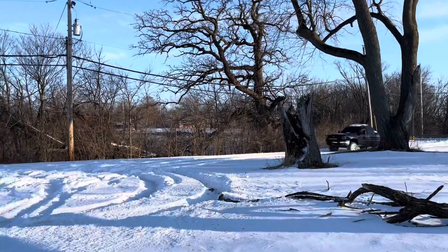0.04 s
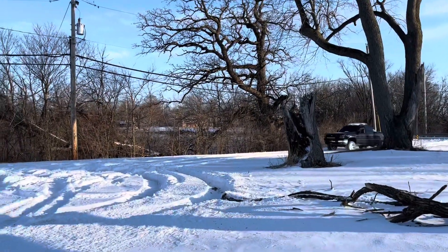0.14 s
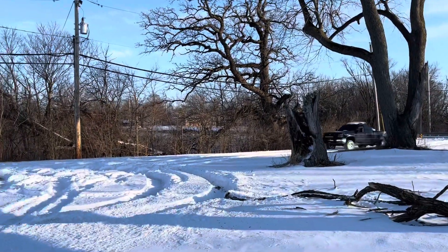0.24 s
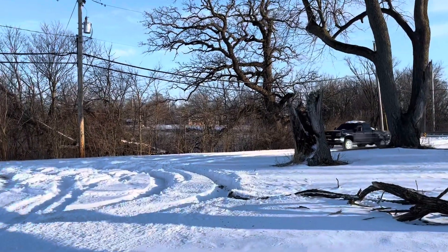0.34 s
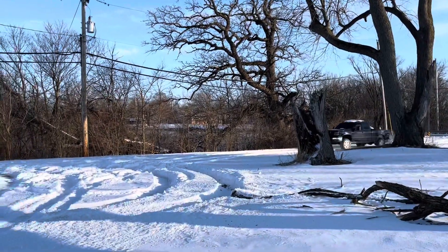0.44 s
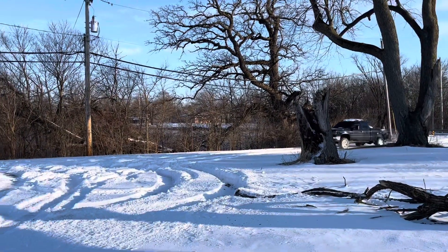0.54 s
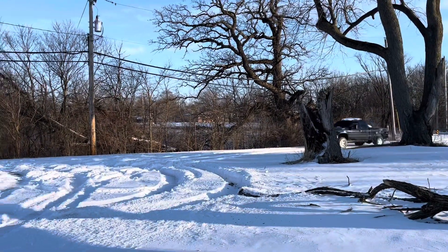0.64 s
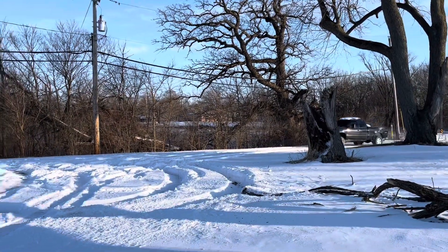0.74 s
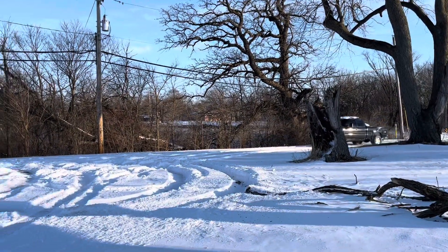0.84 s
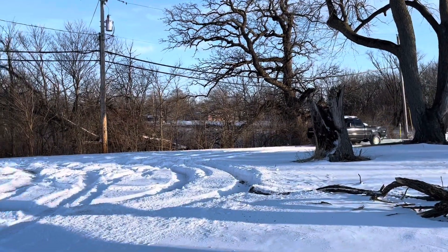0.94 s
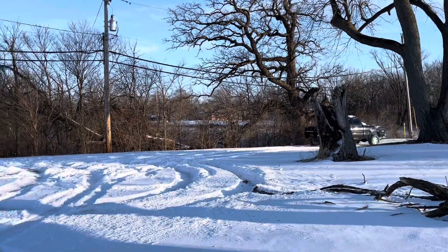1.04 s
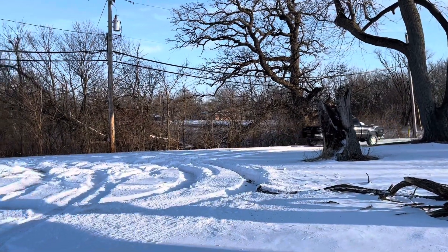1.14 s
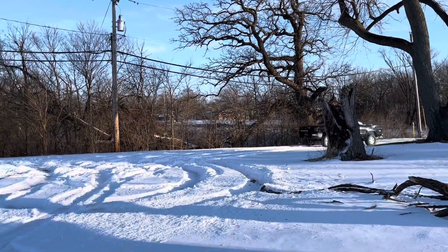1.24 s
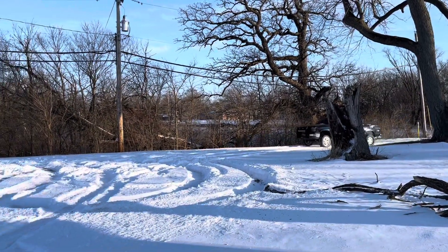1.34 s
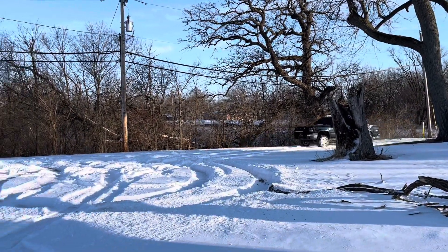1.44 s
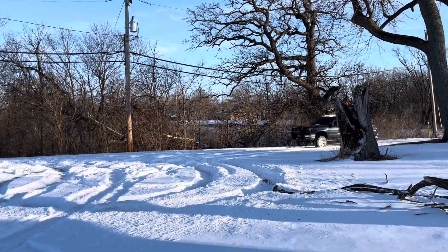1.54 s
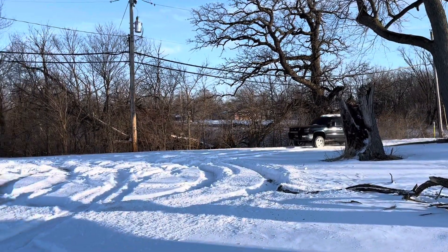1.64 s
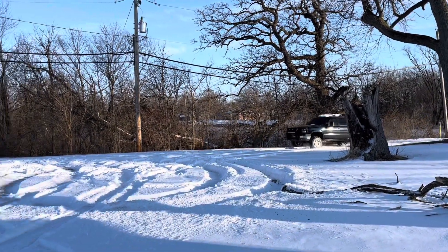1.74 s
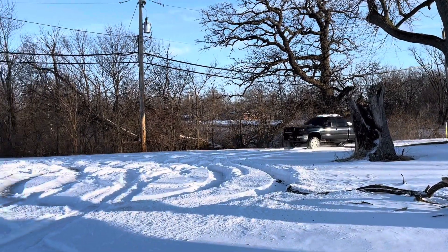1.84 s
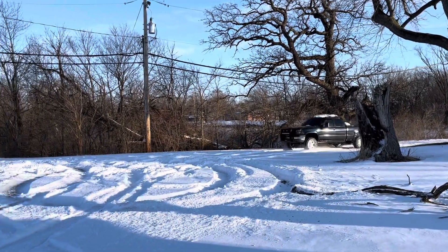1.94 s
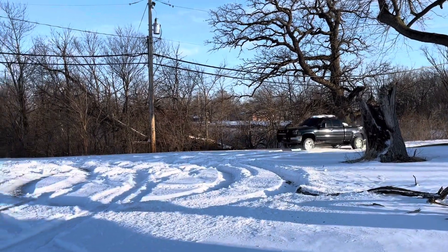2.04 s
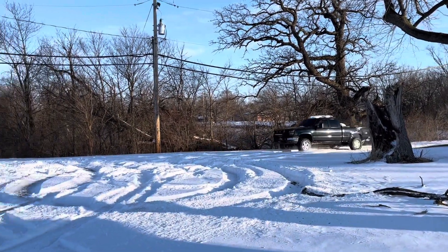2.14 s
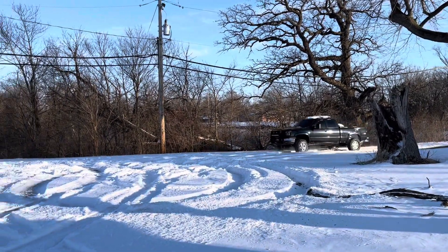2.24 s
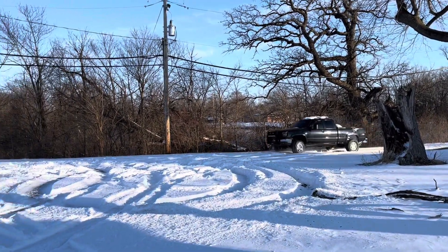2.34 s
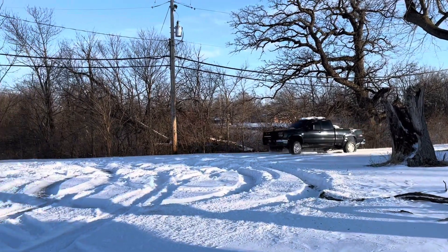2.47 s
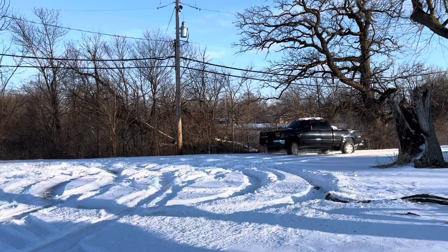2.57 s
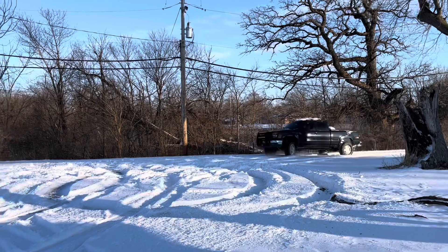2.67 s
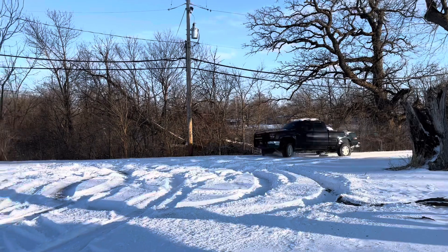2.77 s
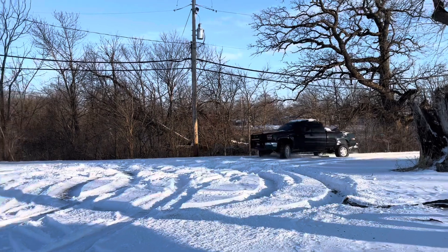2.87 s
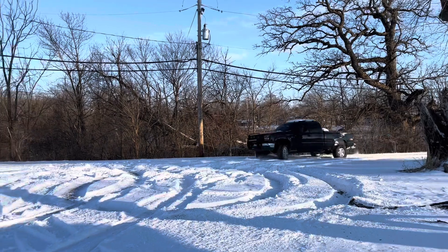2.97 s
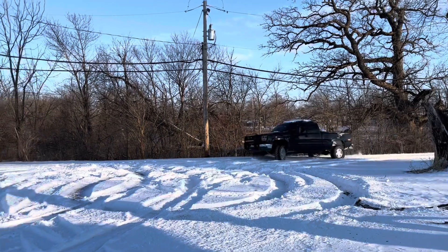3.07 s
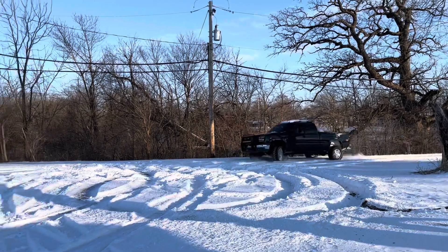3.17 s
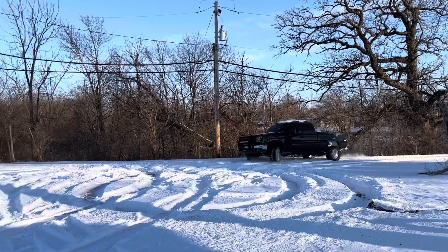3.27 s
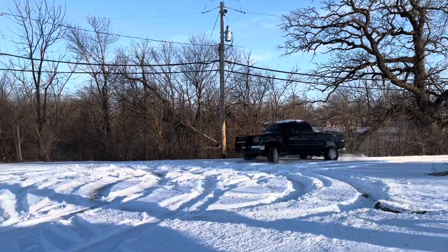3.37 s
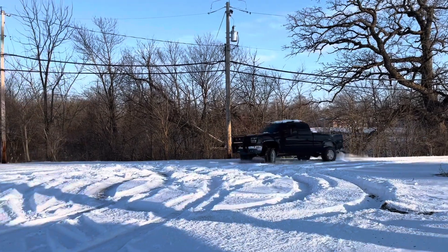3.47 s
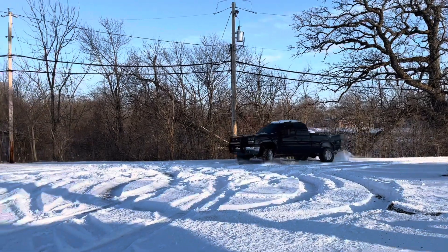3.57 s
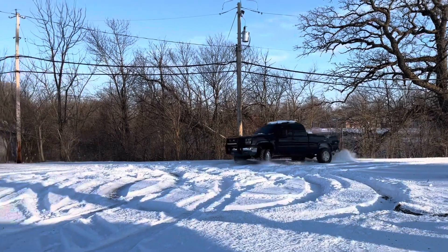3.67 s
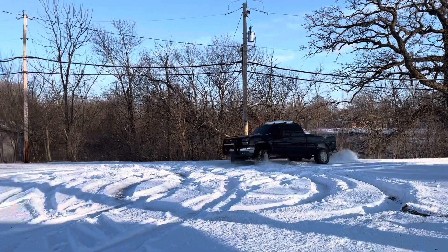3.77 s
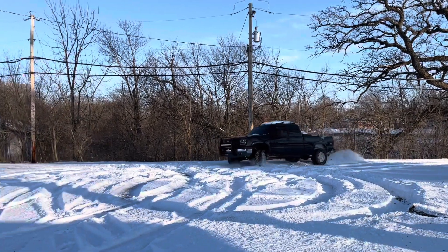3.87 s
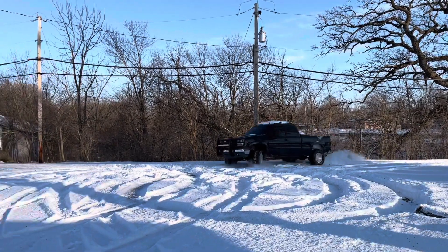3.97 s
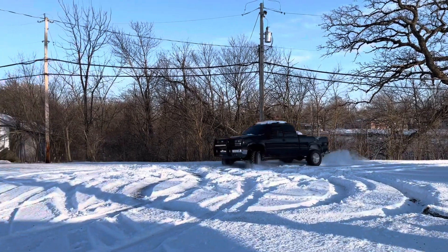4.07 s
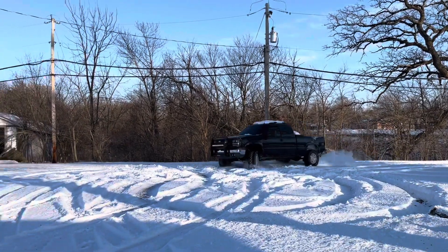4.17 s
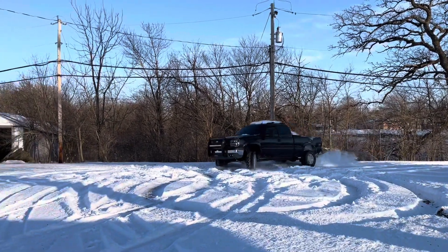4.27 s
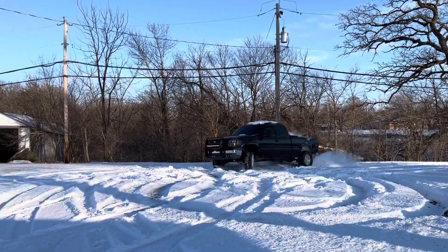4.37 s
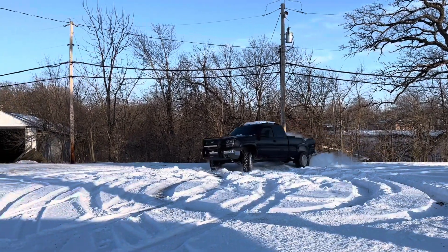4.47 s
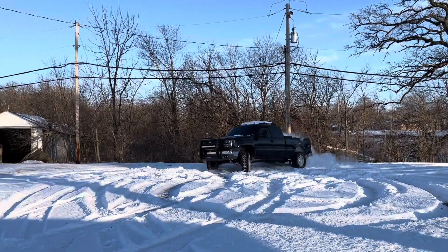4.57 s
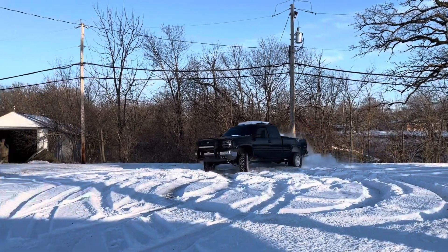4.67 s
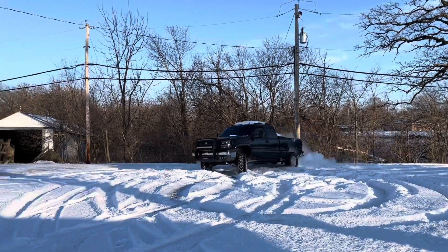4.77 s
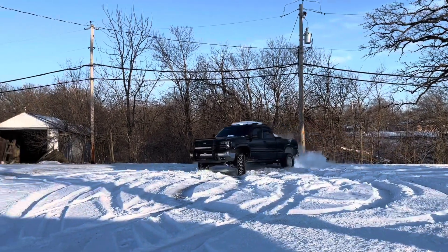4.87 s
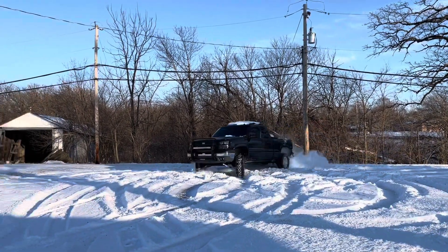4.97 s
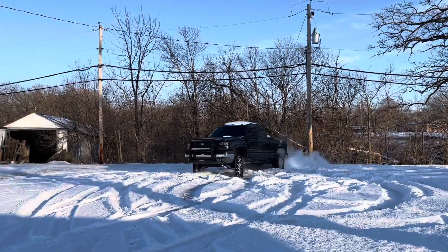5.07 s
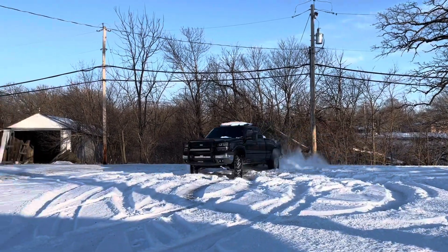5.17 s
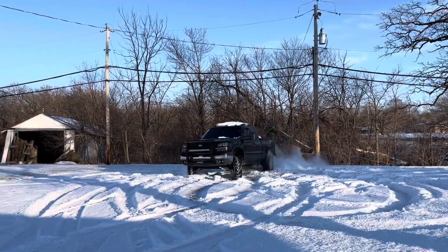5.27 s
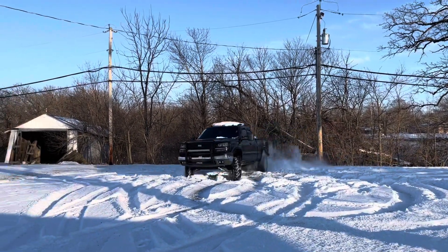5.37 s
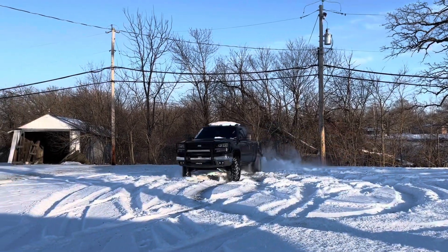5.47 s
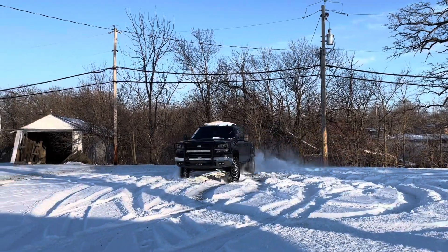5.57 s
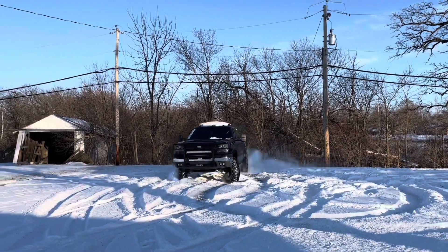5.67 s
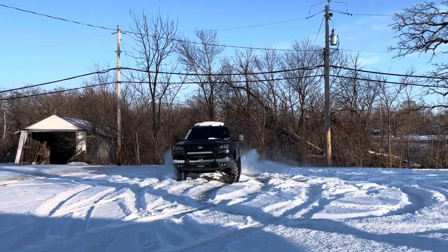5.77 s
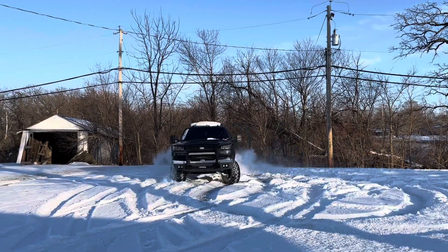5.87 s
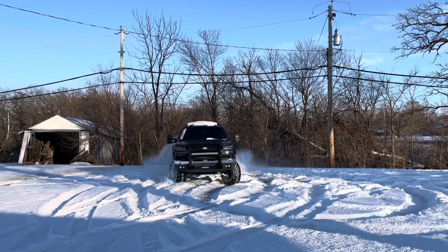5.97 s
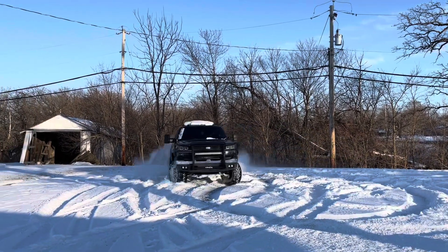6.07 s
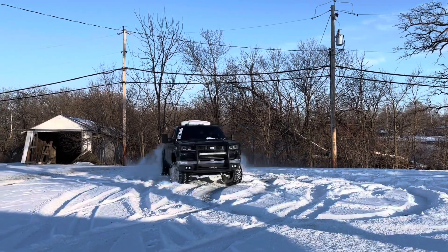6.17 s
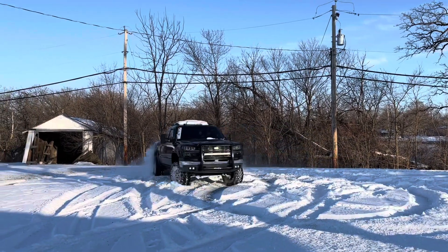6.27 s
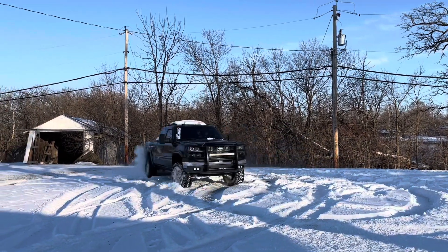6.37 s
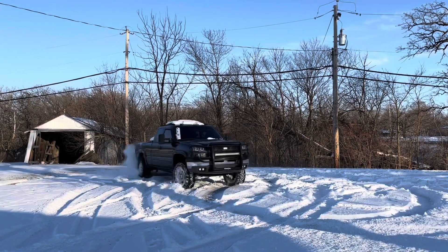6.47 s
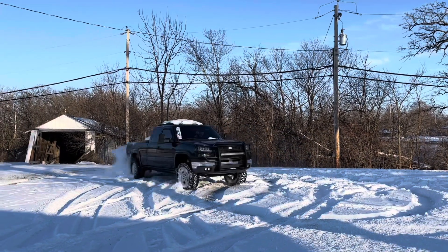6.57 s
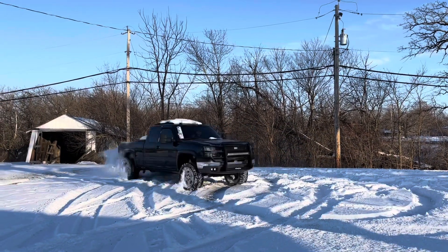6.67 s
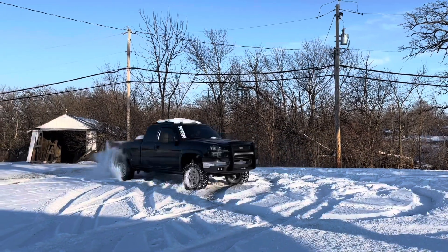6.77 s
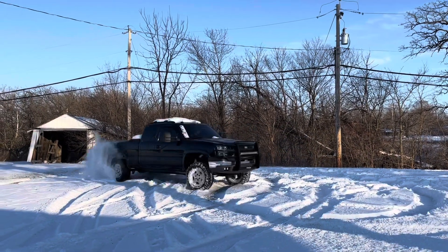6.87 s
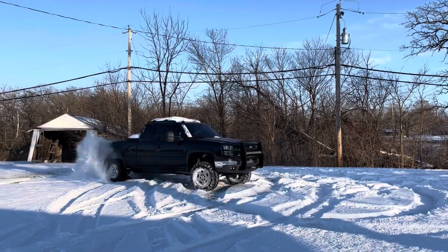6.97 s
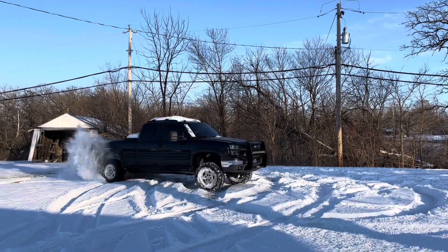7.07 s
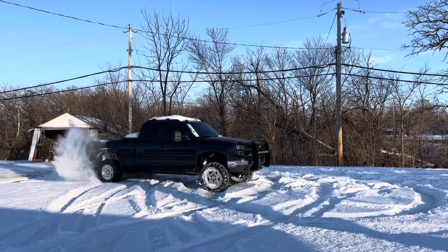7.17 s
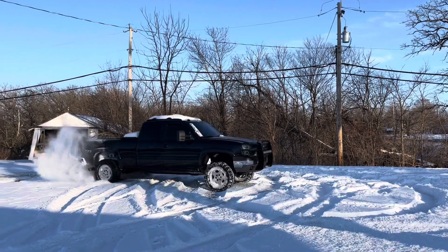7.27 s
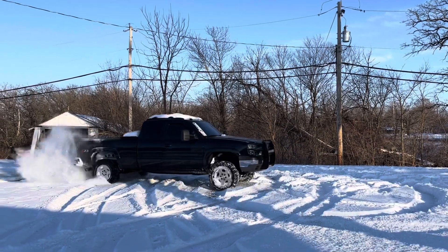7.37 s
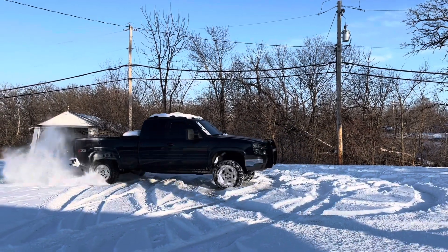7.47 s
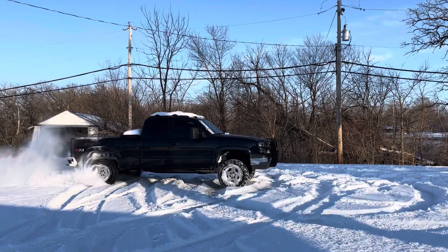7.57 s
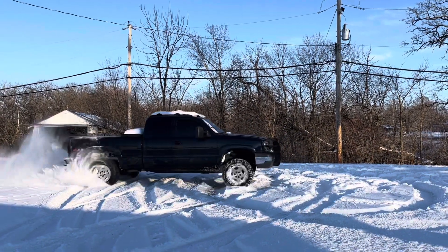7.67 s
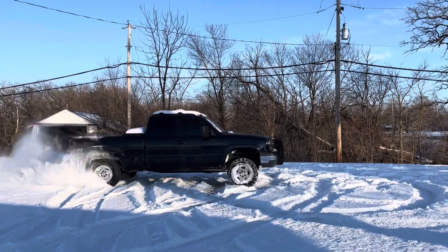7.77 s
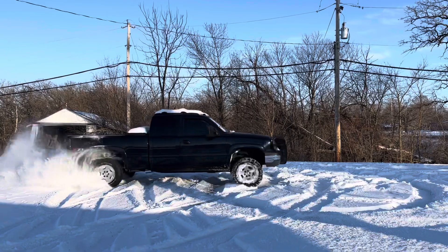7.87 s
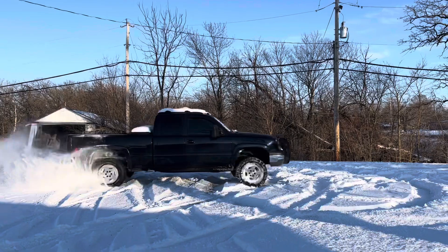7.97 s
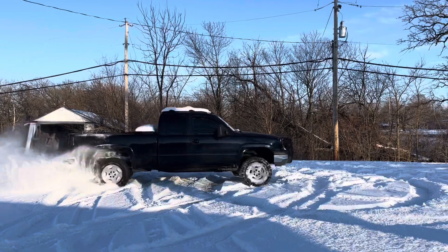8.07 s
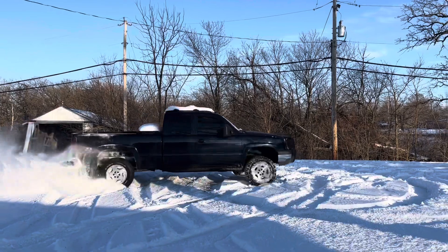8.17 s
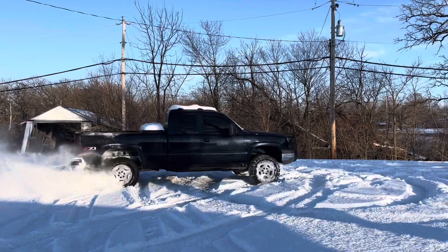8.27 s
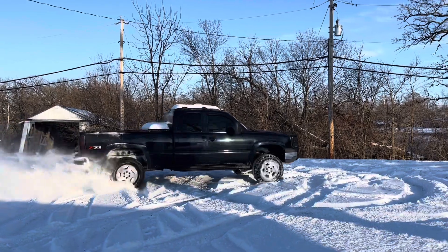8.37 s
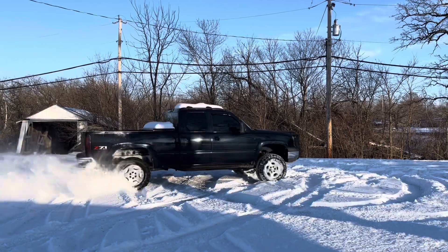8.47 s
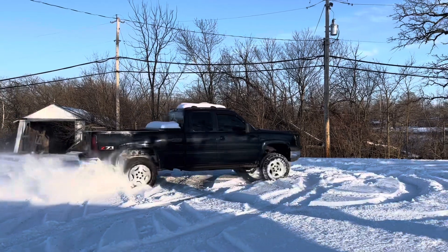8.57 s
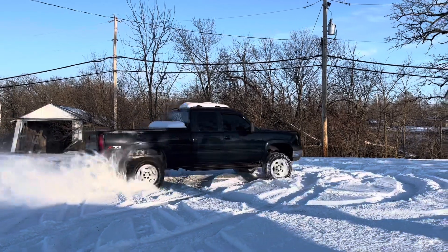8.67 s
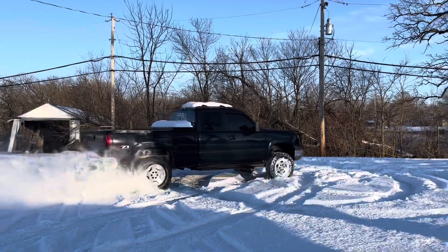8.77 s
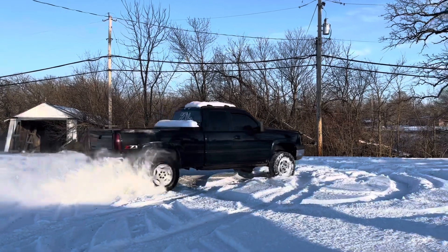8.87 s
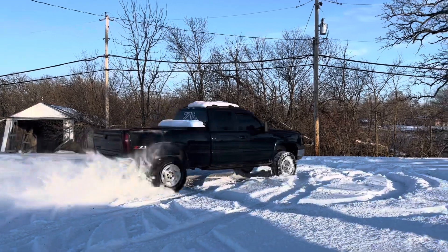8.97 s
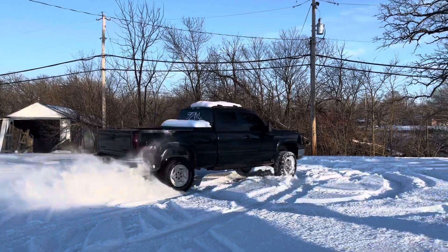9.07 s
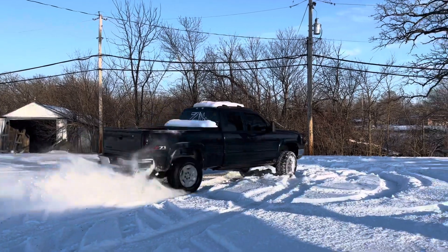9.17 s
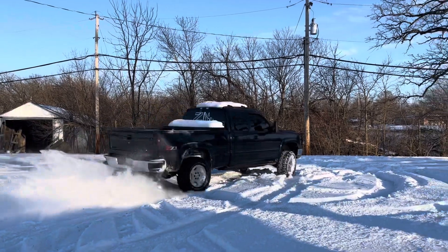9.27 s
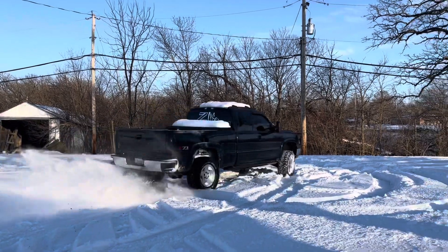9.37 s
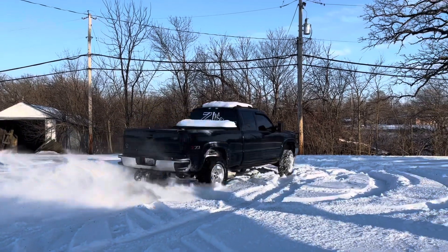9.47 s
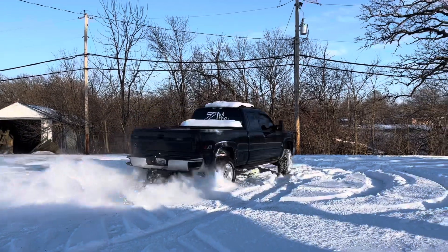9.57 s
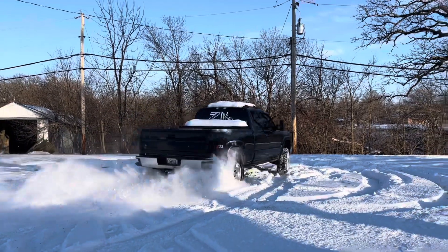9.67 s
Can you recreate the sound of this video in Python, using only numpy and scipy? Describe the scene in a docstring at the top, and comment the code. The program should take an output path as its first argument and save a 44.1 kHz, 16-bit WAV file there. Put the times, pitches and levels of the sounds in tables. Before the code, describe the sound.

Distant uneven engine burble, two throttle blips, then a sustained booming V8 roar nearing with hard exhaust crackle, tyre scrub and snow hiss.

```python
"""First a V8 pickup with open twin pipes burbles far off in a snowy yard, and is blipped twice.
Then it is mostly held high while it slides round and passes close by, left tailpipe first, then right.
The exhaust booms on the orders of the engine cycle, and each firing spits a rasping puff of noise.
Throttle, engine speed, distance and heading set how loud each part is.
Gliding tones make the engine whine; coloured noise makes the tyres scrub and spray snow."""
import sys
import numpy as np
from scipy import signal
from scipy.fft import rfft, irfft
from scipy.io import wavfile
from scipy.ndimage import uniform_filter1d

SR = 44100
rng = np.random.default_rng(int(sys.argv[2]) if len(sys.argv) > 2 else 0)


def materialize(psi):
    """Save the field psi as 16-bit PCM at rate SR to the path in sys.argv[1].

    A 1-D psi becomes a single channel; in a 2-D psi each row is a channel.
    """
    bounded = np.clip(np.atleast_2d(psi).T, -1, 1)
    quanta = np.round(bounded * 32767).astype(np.int16)
    wavfile.write(sys.argv[1], SR, quanta)


N = 428652
TIME, HZ = np.arange(N) / SR, np.arange(N // 2 + 1) * SR / N

# engine speed: time_s, firings_per_s
SPEED = [(0.0, 111.8), (0.11, 110.2), (0.47, 83.6), (0.89, 99.2), (1.3, 81.8), (2.0, 78.9), (2.38, 61.5),
         (2.86, 112.3), (3.02, 112.0), (3.29, 91.6), (3.89, 128.8), (4.28, 96.3), (4.64, 125.5),
         (5.18, 146.7), (5.53, 124.3), (5.78, 133.7), (6.21, 138.6), (6.51, 150.2), (6.79, 138.5),
         (7.25, 135.6), (7.7, 141.5), (8.12, 126.1), (8.66, 134.6), (8.89, 133.9), (9.25, 144.8),
         (9.51, 144.4), (9.72, 148.6)]
# burbling, two blips, then mostly held down: time_s, throttle (0-1)
THROTTLE = [(0, 0.16), (.39, 0.01), (.8, 0.44), (1.14, 0), (1.85, 0.31), (2.33, 0), (2.45, 0.61),
            (2.58, 0.98), (2.86, 1), (3.17, 0.46), (3.5, 0.83), (3.82, 0.86), (4.16, 0.38), (4.42, 1),
            (5.18, 1), (5.34, 0.64), (5.56, 0.85), (6.2, 0.84), (7.7, 0.95), (8.08, .86), (8.6, 0.97),
            (9.72, 0.96)]
# the truck's path: time_s, distance_m, near flank turned to us (0-1), nose turned to us (0-1)
PATH = [(0, 49, 0, 0.3), (2.4, 51.8, 0, 0.07), (3.7, 21.6, 0.09, 0), (5.15, 22.8, 0.19, 0.65),
        (5.55, 18, 0.4, 0.4), (6.2, 20.6, 0.45, 1), (6.55, 16.9, 0.71, 0.79), (7.4, 15.3, 0.98, 0.43),
        (8.3, 13.95, 1, 0.06), (9.72, 17.7, 0.73, 0.13)]
# how the truck is turned: time_s, heading_degrees (0 head-on, 90 right flank, 180 tail)
HEADING = [(4.9, -47.5), (5.7, -2.5), (6.2, 1.5), (7.2, 47.5), (8.2, 96.5), (8.9, 93), (9.4, 132)]

# one engine cycle, uneven on each bank: place (in firings), share through right pipe (0-1), strength_db
FIRINGS = [(4.38, 1, 4), (5.66, 0, 2), (6.3, 1, .5), (7.3, 1, -.5), (8.6, 0, 0), (9.35, 1, -4),
           (10.5, 0, -3), (11.5, 0, -1)]
# strength of each order of the engine cycle: order, light_throttle_db,
# then pulling_db at four headings: left front, head-on, right flank, right rear
ORDERS = [(3, -21, -3, -23.5, -5, -11.5), (4, -10, -9.5, -8, -16.5, -17), (5, 4.0, -3.0, -11.5, -8.0, -6.5),
          (6, -10.5, -6.5, -11.5, -13, -13), (7, -1, -9, -16.5, -7.5, -7.5), (8, 0.0, 0.0, 0.0, 0.0, 0.0),
          (9, -4, -3.5, -8, -3.5, -8), (10, -18.5, -4.5, -23.5, -13, -12.5),
          (11, 2.5, -9, -14, -10.5, -7.5), (12, -27.5, -9, -6.5, -10, 0), (13, -1.5, -10, -4.5, 1.5, 1),
          (14, -23, -22, -16, -14.5, -17), (15, -4.5, -12.5, -7, -8.5, -2.5),
          (16, -7.5, -17.5, -12.5, -1.5, -5), (17, -13.5, -8, -11.5, -7.5, -12),
          (18, -20, -9.5, -18, -13.5, -13.5), (19, -9.5, -12.5, -19.5, -22.5, -11),
          (20, -16.5, -17.5, -15.5, -8.5, -10.5), (21, -15.5, -18.5, -26.5, -15.5, -29.5),
          (22, -23, -17, -31, -7.5, -18.5), (23, -18.5, -25.5, -22, -8.5, -6.5),
          (24, -19.5, -27, -23, -19, -14.5), (25, -25, -30, -30.5, -20, -34.0),
          (26, -25, -24, -31.5, -18, -21.0), (27, -19.5, -24.5, -26, -26.5, -22.5),
          (28, -23, -27.5, -36, -20.5, -23), (29, -15, -23, -36, -22, -29),
          (30, -17, -29, -38.5, -25, -27.0), (31, -24, -29.5, -39.5, -21, -26.5),
          (32, -16.5, -35, -31, -21.5, -24.5), (33, -23, -34, -30.5, -24, -30),
          (34, -33, -28, -27.5, -27.5, -32.5), (35, -29, -29.5, -33.5, -21.5, -33),
          (36, -13, -28, -34.5, -13.5, -26.5)]
# headings of those four pulling columns: heading_degrees
ORDER_HEADINGS = (-45, 0, 95, 135)
# resonances of the exhaust pipes, for the drone: pitch_hz, gain_db
PIPE_RESONANCES = [(35, -15), (55, -2.5), (78, 3), (100, 4), (140, 0.5), (165, -1.5), (192, -4),
                   (215, -9.5), (250, -9.5), (280, -7), (312, -3), (335, -7), (370, -7.5), (410, -18)]
# the firing note swells and cancels as the truck moves: time_s, level_db over the boom
FIRING_NOTE = [(0.0, 3.5), (0.23, 1.5), (0.29, -6.5), (1.07, -6.5), (1.27, -3), (2.07, 4), (2.4, 1),
               (3.42, -3), (3.56, 4.5), (3.76, -4), (4.41, 3), (4.58, -1), (5.81, 6.5), (6.15, 2),
               (6.29, -9.5), (6.49, 2.5), (7.54, 8), (7.8, 2), (8.18, 6.5), (9.72, 3)]
# the fifth order, a deep lope: time_s, level_db over the boom
LOPE = [(0.0, 8), (0.15, 4.5), (0.3, -13), (0.76, 3.5), (2.34, -16.5), (2.66, 0), (3.36, -15),
        (3.53, -14.5), (3.71, 5), (4.08, 3.5), (4.3, -21), (4.58, 3), (4.91, -6.5), (5.98, -5),
        (8.11, -0.3), (9.72, -3)]
# the ninth order swells and cancels: time_s, extra_db
NINTH_ORDER = [(3.3, -0.5), (3.9, 6), (5.2, -2), (5.8, 2), (6.2, 10.5), (6.54, -3.5), (7.2, -3), (8.4, 2.5),
               (9.7, -0.5)]
# the upper orders swell and fade as the truck moves: time_s, extra_db
UPPER_ORDERS = [(0, -4.5), (1.1, -2), (1.8, 3.5), (2.7, -9), (3.8, -0.5), (4.5, -0.5), (5.25, 4.5),
                (5.45, 0.5), (5.8, 3), (6.4, 2.5), (7.4, 0.5), (8.6, 2), (9.7, 1.5)]
# one firing per cycle cracks harder as the tailpipe swings to us: time_s, extra_db (each layer takes a share)
CRACKING_FIRING = [(5.5, 0.5), (7.3, -11), (8.1, 3), (8.33, 1), (8.57, 8.5), (8.8, 10), (9.1, 20.5),
                   (9.45, 18.5), (9.62, 11.5), (9.72, -7.5)]

# Loudness rules, one per part of the exhaust, for NEAR_M, HIGH_FIRING_HZ and full throttle:
# base_db, shut_to_full_throttle_db, speed_db (per octave), flank_on_db, nose_on_db
BOOM_LAW = (-12.5, 11, 0, -3.5, 2.5)
# upper orders of the drone, same columns
NOTES_LAW = (-23, 13, 2.5, 2, -2.5)
# growl, same columns; the scene lowers and squeezes the result
GROWL_LAW = (-15.5, 15.5, 5, 8.5, 2.5)
# rasp, same columns
RASP_LAW = (-27.5, 23.5, 9, -2, -3.5)
# hollow pipe colour, same columns
HOLLOW_LAW = (-49, 11, 15, 2, 4)
# ringing tailpipe mouth, same columns
RING_LAW = (-44, 23.5, 5, 5.5, -8.5)
# crackle, same columns
CRACKLE_LAW = (-33, 30.5, 4.5, -3, -10)
# stray pops of unburnt fuel, same columns
POP_LAW = (-34, 22, 4, -10, -5)

# Noise colours; only the shape counts, as each is brought to one level. Deep rumble: pitch_hz, level_db per Hz
RUMBLE = [(20, -25.5), (35, -23), (55, 0), (90, -1.5), (150, -5), (200, -13.5), (300, -21), (450, -31.5)]
# growl: pitch_hz, level_db per Hz
GROWL = [(130, -29.5), (200, -12), (300, 1.5), (370, -0.5), (450, -9), (650, -42.5)]
# rasp away from the flank: pitch_hz, level_db per Hz
RASP_NOSE = [(300, -22), (450, -4), (560, -3), (700, -5.5), (830, 6.5), (1020, -3), (1420, 2), (1750, -7.5),
             (2100, -8.5), (2450, -8.5), (2900, -32)]
# rasp flank-on: pitch_hz, level_db per Hz
RASP_SIDE = [(300, -27.5), (450, -0.5), (650, -1), (870, -0.5), (1020, -5), (1350, -1.5), (1750, -8.5),
             (2050, -9.5), (2350, -20), (2900, -26.5)]
# hollow colour of the pipes, heard even on light throttle: pitch_hz, level_db per Hz
HOLLOW = [(600, -29.5), (760, -0.5), (850, 4.5), (980, -18.5), (1200, -24.5), (1420, -8), (1650, -21),
          (2100, -19), (2480, 2), (2900, -16.5)]
# ringing mouth of the tailpipe, heard when the flank turns to us: pitch_hz, level_db per Hz
RING = [(1600, -15), (1780, 1), (2030, 0), (2200, -11), (2400, -26)]
# crackle away from the flank: pitch_hz, level_db per Hz
CRACKLE_NOSE = [(1700, -27.5), (2400, 9), (2900, -1.5), (3500, 1.5), (4500, -9.5), (5300, -25.5),
                (7500, -29.5), (14000, -34.5)]
# crackle flank-on: pitch_hz, level_db per Hz
CRACKLE_SIDE = [(1700, -24.5), (2350, -10.5), (2700, 2), (3100, -1), (3600, -0.5), (4200, -5), (4650, -5),
                (5100, -15), (6500, -10), (8300, -22.5), (10500, -19.5), (14000, -30)]
# scrubbing tyres: pitch_hz, level_db per Hz
SCRUB = [(400, -3), (650, -8), (900, -0.5), (1050, -7), (1300, -6.5), (1700, -16), (2500, -22)]
# flying snow: pitch_hz, level_db per Hz
SNOW = [(1500, -3.5), (3000, 9), (5000, -2), (6500, -0.5), (9000, -8.5), (12000, -1), (15000, -4)]
# quiet air of the yard: pitch_hz, level_db per Hz
YARD_AIR = [(25, -4), (70, 0), (130, 3.5), (220, -7), (370, -11.5), (480, -18.5), (700, -21), (850, -24),
            (1400, -27.5), (1800, -30.5), (2500, -32.5), (5000, -36), (7500, -51), (14000, -46.5)]

# single harder barks of the exhaust: start_s, peak_db (roughly), pitch_hz
BARKS = [(4.4025, -21.5, 1310), (4.5444, -25.5, 1425), (4.586, -26, 1420), (4.629, -26.5, 1300),
         (4.673, -26.5, 1360), (4.693, -23, 1325), (4.7556, -20, 1195), (4.938, -20, 1374),
         (4.9914, -22, 1190), (5.106, -28, 1520), (6.463, -34.5, 2080), (6.534, -21, 908),
         (6.568, -33, 2100), (6.587, -31, 2080), (6.678, -29.5, 2000), (6.791, -29.5, 1950),
         (6.907, -32, 2160), (7.081, -24.5, 2000), (7.199, -23.5, 2050), (7.2124, -25, 2020),
         (7.318, -27.5, 1980), (7.389, -27.5, 2060), (7.433, -19.5, 1960), (7.4912, -18, 2024),
         (7.5475, -20.5, 2010), (7.5606, -28, 1970), (7.6045, -19, 1066), (7.661, -22.5, 1960),
         (7.72, -22, 2070), (7.7762, -21, 2090), (7.8344, -29.5, 2100), (7.893, -28, 1890),
         (9.2155, -19, 1140), (9.24, -19, 996), (9.272, -18.5, 1380), (9.327, -22, 1990),
         (9.3812, -17.5, 1263), (9.437, -17, 1125), (9.4925, -20.5, 1400)]
# sharp ticks from the far engine as the throttle first opens: start_s, level_db (before a small lift)
TICKS = [(0.582, -56), (0.6454, -52), (0.6774, -52), (0.701, -53), (0.7326, -53), (0.7626, -51),
         (0.787, -54), (0.8334, -55), (0.846, -50), (0.8654, -52), (0.8969, -55), (0.93, -52), (0.949, -59),
         (0.989, -59), (1.034, -55), (1.075, -59), (1.123, -56)]
# what the pipes ring with when a tick or pop strikes them: pitch_hz, level_db, time to fall 60 dB in s
PIPE_MODES = [(846, 3.5, 0.034), (1190, -2, 0.018), (1430, 2.5, 0.013), (2200, -5.5, 0.011),
              (2545, -3, 0.021), (3120, -6.5, 0.02), (3550, -4.5, .02), (4360, -7.5, 0.016)]
# engine whines, each a short glide: start_s, end_s, first_hz, middle_hz, last_hz, level_db
WHINES = [(3.157, 3.26, 2050, 2060, 1980, -55), (3.7, 3.982, 1440, 1510, 1454, -40),
          (3.833, 3.93, 1900, 1860, 1850, -54), (4.169, 4.278, 2050, 2030, 2010, -50),
          (4.272, 4.335, 1940, 1915, 1860, -48), (5.296, 5.391, 1630, 1643, 1620, -45.5),
          (5.31, 5.49, 1990, 2014, 1820, -47.5), (5.341, 5.524, 2380, 2300, 2260, -51),
          (5.67, 5.781, 1170, 1178, 1150, -38), (5.707, 5.82, 1970, 1960, 2020, -43),
          (5.847, 6.106, 2000, 2030, 2030, -47.5), (5.896, 6.138, 1620, 1640, 1620, -54),
          (5.7, 6.206, 790, 810, 820, -44), (6.261, 6.35, 2085, 2120, 2130, -48.5),
          (6.379, 6.513, 1335, 1346, 1320, -40)]
# the spinning tyres bite and scrub: middle_s, length_s, level_db
SCRUBS = [(0.188, 0.89, -59.5), (5.538, 0.28, -34.5), (6.44, 0.18, -38), (7.017, 0.21, -30),
          (7.527, 0.73, -30), (9.261, 0.12, -30), (9.547, 0.9, -40)]
# snow thrown by the tyres: time_s, level_db (before the throttle changes it)
SPRAY = [(0, -61), (1, -77), (2, -57), (3, -52), (4.9, -47.5), (6, -46.5), (7.6, -43.5), (8.1, -51.5),
         (8.6, -54), (9.72, -52)]
# echoes off trees and sheds: delay_s, level_db (before the level of all echoes together)
ECHOES = [(0.0122, -14.5), (0.047, -26), (0.084, -18), (.139, -21), (.21, -34)]
# the two microphone ports: pitch_hz, left_lead_nose_on_rad, left_lead_side_on_rad,
# left_minus_right_nose_on_db, left_minus_right_side_on_db
PORTS = [(100, 0.03, -0.04, .2, -.4), (400, 0.3, 0.38, -0.5, 0), (846, -1.5, 0.25, -1, 4),
         (1260, 0.9, 1.48, -4, 0.5), (1615, -2, 2.5, 0, -1), (1800, 0.54, -0.4, 0.5, -.5),
         (2500, 0.28, 0.93, -2.5, -3.5), (3400, 1.37, 4, -1.5, 8), (4720, 1.5, 1, 8, 3),
         (5900, -0.7, -1.2, 5.5, -1.5), (7600, -2, -1.8, 2, 2), (7830, -3.5, -3, 0, 0.5),
         (8870, -3.8, -3.6, -1, -2), (10800, -5.5, -5.5, 0, 0), (13300, -7, -7.5, 0, 1),
         (14700, -16, -8, 3.5, -1.5)]

NEAR_M, HIGH_FIRING_HZ = 14, 140
COASTING, PULLING = 0.42, 0.66  # throttle between which the note changes from burble to roar
BOOM_LEAD = 1.983  # firings by which the drone runs ahead of the cycle count
PUFF_LEAD_S = 0.0177  # seconds by which the puffs come before the cycle count
ORDER_FLUTTER_DB, ORDER_WANDER_RAD = 0.45, 0.08  # rms waver of an order, per multiple of the firing rate
# Head-on the two banks bunch up once a cycle: basic swing (scaled per layer), place in firings.
THROB_DB, THROB_PLACE = 1, 1.5
# Flank-on the growl swells just after the cracking firing: swing, place in firings.
FLANK_THROB_DB, FLANK_THROB_PLACE = 5.5, 4.73
POPS_PER_S = 70
SPRAY_THROTTLE_DB = 3.5  # rise in flying snow from shut to full throttle
YARD_AIR_DB = -44


def drone(cycles, firing_hz, load, heading, levels_db):
    """Orders of the engine cycle glide through the pipe resonances; the uneven firing sets how they line up."""
    firing_db, fifth_db, low_db, notes_db, upper_extra_db = levels_db
    place, right, strength_db = np.transpose(FIRINGS)
    weights = from_db(strength_db / 2 - 1.5 * (1 - right))  # the left pipe is a little weaker
    waves, power = np.zeros((4, N)), np.zeros((4, N))
    ninth_db, = in_time(NINTH_ORDER)
    for order, light_db, *pulling_db in ORDERS:
        # groups: firing note, lope, other low orders, upper orders
        group = 0 if order == 8 else 1 if order == 5 else 2 if order <= 12 else 3
        multiple = order / len(FIRINGS)
        pulling_now_db = np.interp(heading, ORDER_HEADINGS, pulling_db)
        order_db = (1 - load) * light_db + load * pulling_now_db + ninth_db * (order == 9)
        gain = from_db(order_db + np.interp(multiple * firing_hz, *np.transpose(PIPE_RESONANCES)))
        phase = np.angle(np.sum(weights * np.exp(-2j * np.pi * multiple * place)))
        wander = ORDER_WANDER_RAD * multiple * drift(8.4)  # high orders waver most
        wave = -np.cos(2 * np.pi * order * cycles + phase + wander)
        waves[group] += gain * from_db(ORDER_FLUTTER_DB * multiple * drift(9)) * wave
        power[group] += gain ** 2 / 2
    # On light throttle the upper orders join the boom.
    upper_db = load * notes_db + (1 - load) * (low_db - 6) + upper_extra_db
    return np.sum(waves / np.sqrt(power) * from_db([firing_db, fifth_db, low_db, upper_db]), axis=0)


def puffs(cycles, right_facing, crack_db, decay_s, scatter_db, hidden_db, steady, shock_db):
    """Each firing spits turbulent gas with a sharp shock front, louder from the pipe facing us."""
    place, right, strength_db = np.transpose(FIRINGS)
    turns = np.arange(-1, cycles[-1])[:, None] + place / len(FIRINGS)
    times = np.interp(turns, cycles, TIME) - PUFF_LEAD_S
    at = (np.clip(times, 0, None) * SR).astype(int)
    level_db = strength_db + hidden_db * np.abs(right - right_facing[at])
    level_db += scatter_db * rng.standard_normal(at.shape)
    level_db[:, 0] += crack_db[at[:, 0]]
    heard = (turns > cycles[SR // 40]) & (turns < cycles[-1])
    kicks = np.zeros(N)
    kicks[at[heard]] = from_db(level_db[heard])
    age = TIME[:SR // 25]
    burst = np.exp(-age / decay_s) * (1 - np.exp(-age / 0.0004))
    gate = np.hypot(signal.oaconvolve(kicks, burst)[:N], steady)  # a steady hiss fills the gaps
    shock = np.roll(kicks, np.argmax(burst)) * np.linalg.norm(burst)
    # Divide out the slow level, so that only the loudness rules set it.
    slow = np.sqrt(uniform_filter1d(uniform_filter1d(gate ** 2, size=5200), size=5200))
    return (gate * rng.standard_normal(N) + from_db(shock_db) * shock) / slow


def loudness(law, throttle, firing_hz, distance_m, side, nose):
    """Level in dB: it rises with throttle and speed, falls with distance and turns with the truck."""
    base_db, throttle_db, octave_db, side_db, nose_db = law
    effort_db = throttle_db * (throttle - 1) + octave_db * np.log2(firing_hz / HIGH_FIRING_HZ)
    turn_db = side_db * side + nose_db * nose
    return base_db + effort_db + turn_db - 20 * np.log10(distance_m / NEAR_M)


def barks(attack_s, decay_s, hiss_db):
    """Each bark rings one resonance for a few milliseconds, with a fainter spit of noise around it."""
    out, age = np.zeros(N), TIME[:SR // 20]
    shape = np.exp(-age / decay_s) * (1 - np.exp(-age / attack_s))
    shape /= shape.max()
    for start_s, peak_db, hz in BARKS:
        band = signal.butter(2, [hz * 0.6, min(hz * 3.2, 6500)], "band", fs=SR, output="sos")
        hiss = rms_one(signal.sosfilt(band, rng.standard_normal(len(age))))
        tone = np.sin(2 * np.pi * hz * age)
        mix = (tone + from_db(hiss_db) * hiss) / (1 + from_db(hiss_db))
        start = int(start_s * SR)
        out[start:start + len(age)] += from_db(peak_db) * shape * mix
    return out


def strike_pipes(times, levels_db, scatter_db):
    """Each knock sets every pipe mode ringing with a strength of its own."""
    out, at = np.zeros(N), (np.asarray(times) * SR).astype(int)
    for hz, mode_db, fall_s in PIPE_MODES:
        knocks = np.full(N, 1e-18)  # a tiny floor keeps the filter arithmetic quick
        chance_db = scatter_db * np.clip(rng.standard_normal(len(at)), -2, 2)
        knocks[at] = from_db(levels_db + mode_db + chance_db)
        r, w = from_db(-60 / (fall_s * SR)), 2 * np.pi * hz / SR
        out += signal.lfilter([0, np.sin(w)], [1, -2 * r * np.cos(w), r * r], knocks)
    return out


def pops(level_db):
    """Stray pops of unburnt fuel strike the pipes at random, a few much harder than the rest."""
    times = rng.uniform(0, TIME[-1], int(POPS_PER_S * TIME[-1]))
    hardness_db = 3 * np.minimum(rng.exponential(1, len(times)), 3) - 3
    return strike_pipes(times, level_db[(times * SR).astype(int)] + hardness_db, scatter_db=4)


def whines(waver, flicker_db):
    """Thin engine tones glide in pitch, swelling and fading."""
    out, pitch, flicker = np.zeros(N), 1 + waver * drift(90), from_db(flicker_db * drift(55))
    for start_s, end_s, *glide_hz, level_db in WHINES:
        span = slice(int(start_s * SR), int(end_s * SR))
        progress = np.linspace(0, 1, len(out[span]))
        hz = np.polyval(np.polyfit([0, 0.5, 1], glide_hz, 2), progress) * pitch[span]
        swell = np.sqrt(np.abs(np.sin(np.pi * progress)))
        tone = np.sin(2 * np.pi * np.cumsum(hz) / SR)
        out[span] += from_db(level_db) * flicker[span] * swell * tone
    return out


def scrubs(judder_db):
    """Rubber grinds on packed snow: coloured noise in juddering swells."""
    swell = sum(from_db(level_db) * np.exp(-(2 * (TIME - middle_s) / length_s) ** 2)
                for middle_s, length_s, level_db in SCRUBS)
    return swell * from_db(judder_db * drift(120)) * noise(SCRUB)


def snow_spray(throttle):
    """The tyres throw hissing snow, partly shared by both sides and partly separate on each."""
    level_db = in_time(SPRAY)[0] + SPRAY_THROTTLE_DB * (throttle - 2.5)
    thrown = from_db(level_db + 0.98 * drift(40))
    spray = thrown * noise(SNOW)
    powder = thrown * from_db(-5) * np.array([noise(SNOW), noise(SNOW)])
    return spray, powder


def yard_echoes(x, wet_db):
    """Trees and sheds send back a few dull echoes, at slightly different times on each side."""
    band = signal.butter(1, [300, 6000], "band", fs=SR, output="sos")
    dull = signal.sosfilt(band, x)
    sides = []
    for _ in range(2):
        sides.append(sum(
            from_db(db) * np.interp(TIME - delay_s - rng.uniform(0, 0.001938), TIME, dull, left=0)
            for delay_s, db in ECHOES))
    return from_db(wet_db) * np.array(sides)


def ports(x, side):
    """The two ports hear each pitch with a lead and level difference that depend on how the truck is turned."""
    nose_lead, side_lead, nose_db, side_db = over_hz(PORTS)
    ends = np.minimum(1, np.minimum(TIME, TIME[::-1]) / 0.005)  # 5 ms fades
    half, spectrum = np.array([[0.5], [-0.5]]), rfft(x * ends)  # left gets plus half, right minus half
    head_on = irfft(spectrum * np.exp(1j * half * nose_lead) * from_db(half * nose_db), N)
    flank_on = irfft(spectrum * np.exp(1j * half * side_lead) * from_db(half * side_db), N)
    return (1 - side) * head_on + side * flank_on


def from_db(db):
    """Turn decibels into gain."""
    return np.exp(np.asarray(db) * (np.log(10) / 20))


def rms_one(x):
    """Scale to rms 1."""
    return x / np.sqrt(np.mean(x ** 2) + 1e-20)


def in_time(rows):
    """Draw each column of a table as a curve, sample by sample."""
    s, *columns = np.transpose(rows)
    return [np.interp(TIME, s, c) for c in columns]


def over_hz(rows):
    """Draw each column of a table over log frequency."""
    hz, *columns = np.transpose(rows)
    return [np.interp(np.log(HZ + 1), np.log(hz), c) for c in columns]


def colour(x, spectrum):
    """Filter without pre-echo to a given colour, falling steeply beyond its ends; rms 1."""
    low_hz, high_hz = spectrum[0][0], spectrum[-1][0]
    skirts = 1 / (1 + (HZ / high_hz) ** 6) / (1 + (low_hz / (HZ + 1)) ** 6)
    # Folding the cepstrum forward in time gives a minimum-phase filter.
    cepstrum = irfft(np.log(from_db(over_hz(spectrum)[0]) * skirts + 1e-5), N)
    cepstrum[1:] *= 2 * (np.arange(1, N) < N // 2)
    return rms_one(irfft(rfft(x) * np.exp(rfft(cepstrum)), N))


def noise(spectrum):
    """Make noise of a given colour; rms 1."""
    return colour(rng.standard_normal(N), spectrum)


def drift(rate):
    """Wander at random through about rate new values a second; rms 1."""
    return rms_one(np.interp(TIME * rate, np.arange(2000), rng.standard_normal(2000)))


def scene():
    """Mix exhaust, engine, tyres on snow and the quiet yard."""
    (firing_hz,), (throttle,), (crack_db,) = in_time(SPEED), in_time(THROTTLE), in_time(CRACKING_FIRING)
    distance_m, side, nose = in_time(PATH)
    side = np.clip(side, 0, 1)
    (heading,), (upper_extra_db,) = in_time(HEADING), in_time(UPPER_ORDERS)
    # how far the right pipe has taken over from the left
    right_facing = np.interp(heading, [-30, 15], [0.08, 0.95])
    load = np.clip((throttle - COASTING) / (PULLING - COASTING), 0, 1)
    truck = throttle, firing_hz, distance_m, side, nose
    cycles = np.cumsum(firing_hz) / len(FIRINGS) / SR
    throb_wave = np.cos(2 * np.pi * (cycles - THROB_PLACE / len(FIRINGS)))
    throb_db = THROB_DB * load * (1 - side) * throb_wave
    flank_wave = np.cos(2 * np.pi * (cycles - FLANK_THROB_PLACE / len(FIRINGS)))
    flank_throb_db = FLANK_THROB_DB * side * flank_wave

    low_db = loudness(BOOM_LAW, *truck)
    firing_db, fifth_db = low_db + in_time(FIRING_NOTE)[0], low_db + in_time(LOPE)[0]
    notes_db = loudness(NOTES_LAW, *truck) + 2.1 * throb_db + flank_throb_db
    boom = drone(cycles + BOOM_LEAD / len(FIRINGS), firing_hz, load, heading,
                 (firing_db, fifth_db, low_db, notes_db, upper_extra_db))
    rumble = from_db(low_db - 7.5) * noise(RUMBLE)

    gas = from_db(throb_db) * puffs(cycles, right_facing, crack_db * 0.3, decay_s=0.0055,
                                    scatter_db=1, hidden_db=-13, steady=0.3, shock_db=-2)
    growl_db = loudness(GROWL_LAW, *truck)
    growl_db = np.minimum(growl_db - 8, 0.4 * growl_db - 30.5)  # a loud growl rises more gently
    growl = from_db(growl_db + flank_throb_db - 2.5 * (1 - load)) * colour(gas, GROWL)
    hollow = from_db(loudness(HOLLOW_LAW, *truck)) * colour(gas, HOLLOW)

    blasts = from_db(1.7 * throb_db) * puffs(cycles, right_facing, crack_db * 0.25, decay_s=0.0045,
                                             scatter_db=2, hidden_db=-14, steady=0.12, shock_db=-6)
    rasp = (1 - side) * colour(blasts, RASP_NOSE) + side * colour(blasts, RASP_SIDE)
    rasp *= from_db(loudness(RASP_LAW, *truck))

    mouth = puffs(cycles, right_facing, crack_db * 0.3 + 3, decay_s=0.0055,
                  scatter_db=2.5, hidden_db=-14.5, steady=0.05, shock_db=-6)
    ring = from_db(loudness(RING_LAW, *truck)) * side * colour(mouth, RING)

    spit = puffs(cycles, right_facing, crack_db, decay_s=0.0025,
                 scatter_db=3.2, hidden_db=-25.0, steady=0.12, shock_db=-12.5)
    crackle = (1 - side) * colour(spit, CRACKLE_NOSE) + side * colour(spit, CRACKLE_SIDE)
    crackle *= from_db(loudness(CRACKLE_LAW, *truck) + 0.14 * crack_db)

    barking = barks(attack_s=0.0011, decay_s=0.0031, hiss_db=-18.5)
    ticks = from_db(2) * strike_pipes(*np.transpose(TICKS), scatter_db=2.5)
    popping = pops(loudness(POP_LAW, *truck))
    whine = whines(waver=0.008, flicker_db=3)
    spray, powder = snow_spray(throttle)
    exhaust = growl + rasp + hollow + ring + crackle + barking + ticks + popping
    bright = exhaust + whine + scrubs(judder_db=2.0) + spray

    air = from_db(YARD_AIR_DB) * noise(YARD_AIR)
    # Each port has a little rumble of its own.
    own_rumble = from_db(low_db - 17) * np.array([noise(RUMBLE), noise(RUMBLE)])
    heard = ports(boom + rumble + bright + air, side)
    return heard + own_rumble + powder + yard_echoes(bright, wet_db=5.0)


def record(dry):
    """Round the highest peaks and cut the top of the treble."""
    rounded = dry / (1 + np.abs(dry / 0.98) ** 12) ** (1 / 12)
    # 70 dB down from 15768 Hz upwards
    return signal.sosfilt(signal.cheby2(12, 70, 15768, fs=SR, output="sos"), rounded)


dry = scene()
out = record(dry)
materialize(out)
```